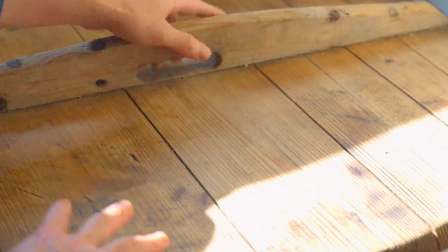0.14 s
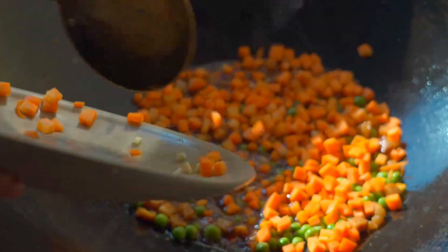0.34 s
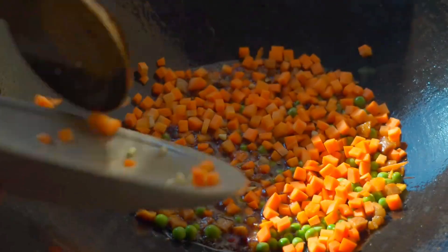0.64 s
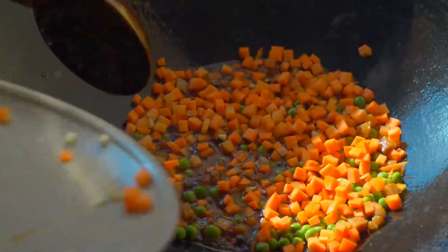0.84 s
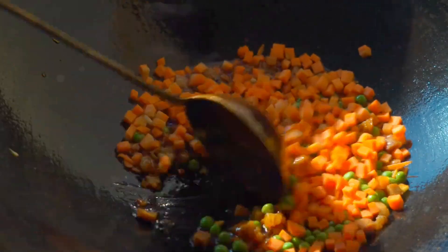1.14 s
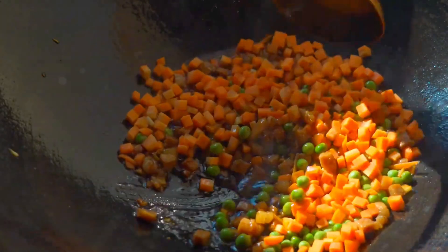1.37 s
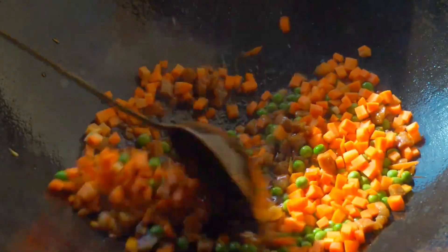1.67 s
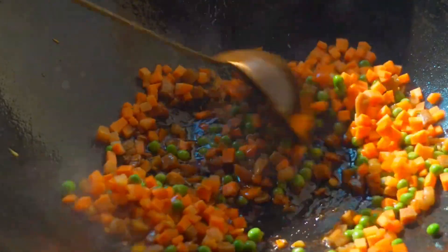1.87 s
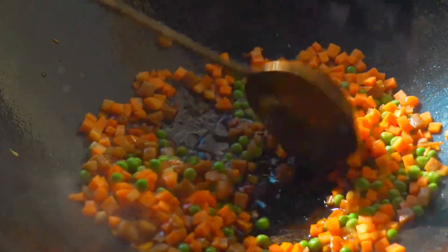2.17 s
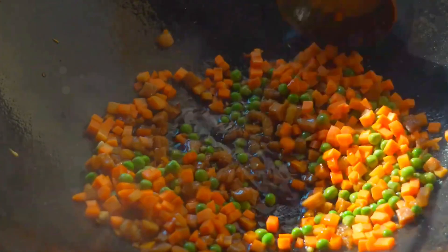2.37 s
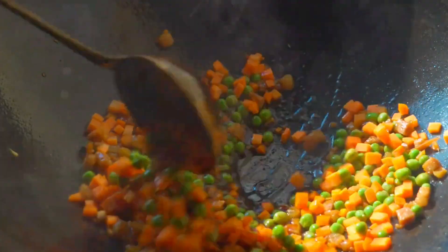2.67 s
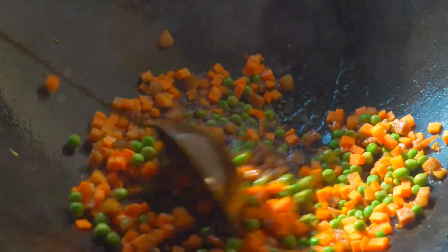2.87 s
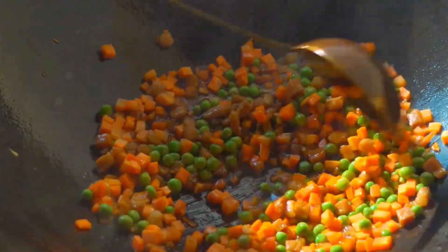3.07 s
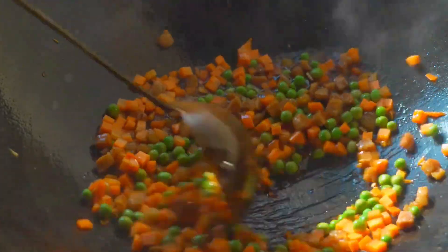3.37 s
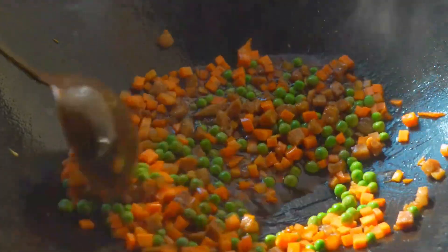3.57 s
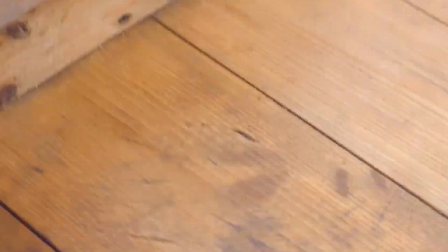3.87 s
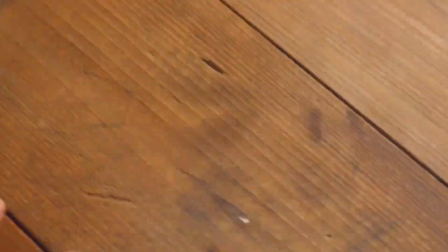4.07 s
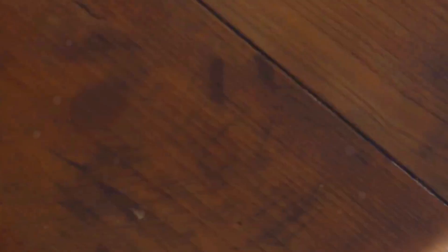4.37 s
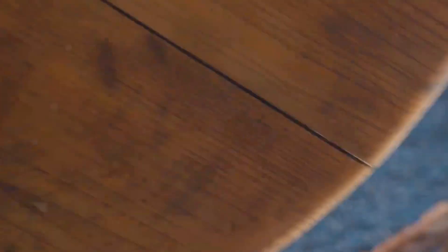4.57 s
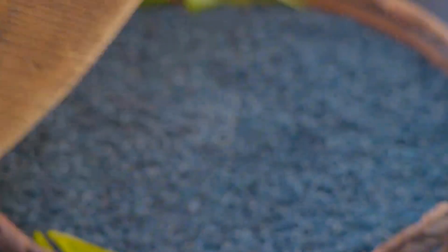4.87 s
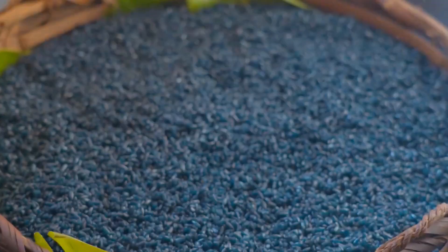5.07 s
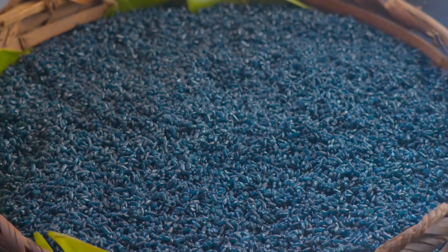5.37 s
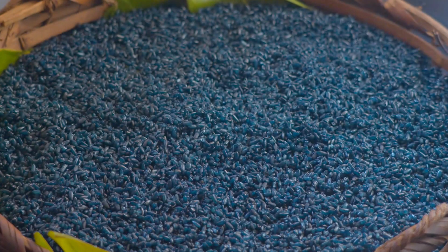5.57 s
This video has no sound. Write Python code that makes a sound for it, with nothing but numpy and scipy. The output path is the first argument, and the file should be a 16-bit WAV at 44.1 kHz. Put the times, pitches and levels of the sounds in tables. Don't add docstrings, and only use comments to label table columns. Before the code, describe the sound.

A faint wooden rustle, then loud wok sizzling with a metal ladle knocking and scraping, a brief hush, and steady steam hiss over bubbling water.

```python
import sys
import numpy as np
from scipy import signal
from scipy.fft import rfft, irfft
from scipy.io import wavfile
from scipy.ndimage import uniform_filter1d

SR = 44100
rng = np.random.default_rng(int(sys.argv[2]) if len(sys.argv) > 2 else 0)


def master(y):
    cut = np.clip(np.atleast_2d(y).T, -1, 1)
    pcm = np.round(cut * 32767)
    wavfile.write(sys.argv[1], SR, pcm.astype(np.int16))


def voltage_ratio(decibels):
    exponent = np.asarray(decibels, float) / 20
    return 10 ** exponent


N = 251811

# (frequency [Hz], density [dB per Hz])
ROOM_SPECTRUM = [(15, -53), (25, -19), (54, -30), (95, -16.5), (154, -2), (331, -12.5), (509, -14.5),
                 (1330, -21.5), (3710, -42), (4820, -60), (7600, -54), (9880, -80), (16700, -120)]
RUSTLE_SPECTRUM = [(350, 3), (600, 2.5), (1560, -7.5), (1720, 2), (1850, -12), (2240, 0.5), (3110, -5),
                   (5300, -7.5), (7600, -35), (9880, -61), (16700, -120)]
HISS_SPECTRUM = [(530, -16), (900, -9), (1160, -2.5), (1330, -7), (1740, -2.5), (1960, -6.5), (2220, -2),
                 (3140, -4.5), (4250, -4), (5270, -7), (6590, -21), (7600, -32.5), (9880, -47),
                 (16700, -120)]
BOIL_SPECTRUM = [(15, -66), (25, -27), (70, -19.5), (123, -5), (218, -7), (252, -1), (391, -3.5),
                 (630, -0.5), (743, 0), (814, 3.5), (1340, -3.5), (2000, 0), (2600, -27), (4400, -120)]
SIZZLE_SPECTRUM = [(530, -21.5), (900, 8), (1080, 4), (1200, 2.5), (1640, 0), (2200, 3.5), (2770, 2),
                   (3030, 0), (3370, 0.5), (4610, -4), (5810, -9.5), (6530, -17), (7600, -29),
                   (9880, -45.5), (16700, -120)]
SIMMER_SPECTRUM = [(15, -74), (25, -50.5), (95, -25.5), (123, -21.5), (145, -20.5), (257, -9.5), (413, -7),
                   (479, -6.5), (515, -9.5), (757, -2), (1630, -11), (2000, -8), (2600, -28.5),
                   (4400, -120)]
# (frequency [Hz], side minus mid [dB])
STEREO_WIDTH = [(60, -7.5), (100, -8.5), (170, -11.5), (300, -14.5), (500, -18.5), (850, -25.5),
                (1450, -19), (2470, -16), (4200, -15), (7150, -15)]
# (start [s], end [s])
HUSHES = [
    (0, 0.292),
    (3.76, 3.897),
]
# (start [s], length [s], level [dB])
STEAMER_HUM = [
    (3.9, 0.35, -8.5),
]
# (start [s], length [s], level [dB])
WOK_HUM = [
    (2.25, 1.7, -10.5),
]
# (start [s], length [s], level [dB])
LADLE_HOLLOW = [
    (3.12, 0.65, -17.5),
]
# (time [s], sizzle level [dB])
HEAT = [(0.3, -24), (0.55, -22.5), (0.75, -24.5), (0.95, -21.5), (1.2, -23.5), (1.3, -19.5), (1.5, -21),
        (1.8, -19.5), (2.3, -18.5), (2.55, -20), (2.8, -19.5), (2.89, -20.5), (3.0, -18.5), (3.25, -20),
        (3.4, -20), (3.55, -19), (3.755, -20)]
# (start [s], length [s], level relative to the sizzle [dB])
FLARES = [(0.53, 0.017, -17), (0.61, 0.011, -5), (1.262, 0.017, -5), (1.32, 0.079, -21),
          (1.378, 0.0042, -12), (1.415, 0.019, -18), (1.5, 0.11, -13), (1.84, 0.016, -8),
          (1.995, 0.011, -24), (2.79, 0.055, -17), (3.22, 0.04, -9.5)]
# (start [s], length [s], strength of cover [dB])
LULLS = [(0.7, 0.04, -14), (1.135, 0.02, -1.5), (1.281, 0.008, -9), (1.297, 0.012, -3), (1.71, 0.013, -12),
         (1.96, 0.034, -3), (2.285, 0.024, -4), (2.46, 0.02, -12), (3.275, 0.022, -13), (3.37, 0.021, -9)]
# (time [s], peak level [dB])
SPITS = [(2.756, -30), (2.84, -11), (2.8631, 0), (2.893, -9.5), (2.942, -10.5), (2.994, -13)]
# (frequency [Hz], level [dB], t60 [s])
SPIT_MODES = [(3800, 3, 0.0034), (2650, 2.5, 0.0065), (1700, -1, 0.0056), (1120, -2, 0.0076),
              (613, 5, 0.0052)]
# (time [s], peak level [dB], centre frequency [Hz])
CRACKS = [(0.5856, -6, 3200), (0.6155, -10, 4800), (0.6294, -6, 4200), (0.6615, -6, 2600),
          (1.0496, -3.5, 2300), (1.0873, -4, 4800), (1.2898, -12.5, 4500), (1.3797, -7, 4500),
          (1.3965, -7, 3200), (1.6868, -10, 2500), (2.2444, -8, 4800), (2.333, -5, 3300),
          (2.4456, -6, 3600), (2.8605, -18, 4100), (2.8645, -7, 1500), (2.8945, -15, 3800),
          (3.3114, -10, 3900), (3.334, -8, 2700), (3.4743, -6, 2200), (3.585, -6, 2300), (0.5866, -7, 800),
          (0.5868, -3, 1150), (0.6293, -7, 1000), (1.0524, 0, 950), (1.2906, -5, 900), (1.2912, -10, 1340),
          (1.2975, -15, 1200), (1.321, -11, 1000), (1.541, -11, 1250), (1.599, -6, 1150), (1.681, -9, 780),
          (1.9385, -5, 756), (1.945, -8, 800), (1.998, -8, 1300), (2.013, -12, 1150), (2.016, -5, 2550),
          (2.036, -2, 2600), (2.058, -8, 2550), (2.088, -10, 2450), (0.824, -14, 900), (0.721, -15, 1250)]
# (time [s], peak level [dB])
THUDS = [(1.088, -16), (1.29, -21), (1.4, -26), (1.685, -24), (2.446, -23), (2.862, -26)]
# (start [s], length [s], level [dB], start frequency [Hz], end frequency [Hz])
SINGING_MODES = [(0.633, 0.025, -18.5, 1494, 1467), (0.664, 0.017, -23, 3150, 3150),
                 (0.664, 0.028, -25, 2250, 2260), (1.112, 0.024, -20.5, 2680, 2490),
                 (1.215, 0.023, -26, 2480, 2450), (1.265, 0.012, -20, 2520, 2530),
                 (1.415, 0.073, -21, 1390, 1390), (1.43, 0.032, -18.5, 1270, 1220),
                 (1.42, 0.03, -20, 512, 513), (1.55, 0.1, -29.5, 390, 390), (1.645, 0.022, -26, 1500, 1330),
                 (1.7, 0.027, -25, 1393, 1280), (1.596, 0.0066, -16.5, 1200, 1196),
                 (1.598, 0.014, -22, 813, 803), (1.632, 0.013, -21, 1300, 1280),
                 (1.535, 0.02, -21.5, 1250, 1160), (1.675, 0.11, -22, 781, 777),
                 (1.705, 0.047, -21.5, 488, 504), (1.745, 0.04, -24, 1475, 1650),
                 (1.937, 0.012, -21, 1410, 1420), (1.955, 0.045, -21.5, 1454, 1495),
                 (1.99, 0.06, -21.5, 900, 746), (2.045, 0.056, -23.5, 1700, 1710),
                 (2.045, 0.11, -30, 760, 805), (2.04, 0.064, -24, 519, 476),
                 (2.008, 0.031, -23, 2480, 2600), (2.135, 0.025, -27, 2810, 2870),
                 (2.135, 0.023, -24, 2220, 2450), (2.495, 0.014, -20, 2400, 2620),
                 (2.5, 0.063, -26, 2690, 2650), (2.515, 0.033, -20, 2580, 2490),
                 (2.866, 0.016, -25, 711, 694), (0.31, 1.63, -39, 249, 249.3),
                 (0.31, 1.47, -40.5, 380.7, 383.7), (3.91, 0.47, -41.5, 249, 251)]
# (start [s], length [s], level [dB])
SQUEALS = [(1.12, 0.054, -25), (1.21, 0.011, -22), (1.265, 0.015, -35), (2.01, 0.083, -24),
           (2.15, 0.011, -27), (2.475, 0.0085, -23), (2.49, 0.061, -16)]
# (frequency [Hz], level [dB], t60 [s])
RIM_MODES = [(2440, -6, .05), (2520, 0, .09), (2585, -4, .07), (2665, -2, .08)]
# (start [s], length [s], level [dB])
BOTTOM_STROKES = [(1.095, 0.038, -15.5), (1.41, 0.043, -14.5), (1.56, 0.099, -20), (1.7, 0.069, -27.5),
                  (1.945, 0.1, -15), (2.06, 0.066, -20), (0.8, 0.18, -23), (1.645, 0.03, -23)]
WALL_STROKES = [(1.095, 0.024, -20), (1.42, 0.028, -17.5), (1.6, 0.012, -20), (1.7, 0.028, -26),
                (1.95, 0.02, -16), (2.13, 0.024, -31)]
# (frequency [Hz], level [dB], t60 [s])
WOK_MODES = [(390, -34.5, 0.028), (457, -9, 0.066), (533, -22, 0.1), (590, -9, 0.044), (700, -17.5, 0.018),
             (794, 0.5, 0.024), (880, -12.5, 0.05), (1049, 7, 0.043), (1232, 0.5, 0.076),
             (1280, 7.5, 0.034), (1370, -9, 0.051), (1390, 1, 0.15), (1660, -4, 0.027)]
# (time [s], peak level [dB], main mode [Hz], second mode [Hz], second mode level [dB])
KNOCKS = [(0.5866, 4.5, 1487, 776, -14), (0.615, -10, 1560, 627, -6), (0.6299, 2, 1400, 744, -2.5),
          (0.6623, -1, 2245, 3090, 3), (1.0523, -4.5, 975, 723, 6), (1.088, 1, 920, 2940, -8),
          (1.118, -9, 800, 2650, 13), (1.2911, 2, 1098, 780, 0.5), (1.3992, 3, 1185, 843, 0),
          (1.4043, 2.5, 1270, 800, -19), (1.4204, -2, 1370, 1190, -9), (1.4336, -11, 1390, 1250, -1),
          (1.5452, -7, 1175, 830, 7), (1.6013, -4, 1200, 805, -2), (1.638, -10, 1270, 880, 4),
          (1.687, 1.5, 752, 466, 6), (2.053, -13, 1622, 790, 19), (1.7515, -10, 1580, 783, -5),
          (1.9376, 0, 773, 1390, -7), (1.947, -8, 1390, 690, 5), (2.159, -14, 1170, 2720, 15),
          (2.2432, -12, 2300, 2230, 10), (2.447, -9.5, 1040, 2620, 11), (1.709, -10, 473, 795, 8)]

EVEN_HEAT_DB = -23
HUM_HZ, HUM_T60_S = 805, 0.064
HUM_DB_PER_S = 47
MIC_CUT_HZ = 6760
SPIT_S = 0.0055


def rms_one(x):
    return x / np.sqrt(np.mean(x ** 2) + 1e-20)


def butter(x, order, hz, kind="low"):
    return signal.sosfilt(signal.butter(order, hz, kind, fs=SR, output="sos"), x)


def in_time(rows, fade=.004):
    s, *columns = np.transpose(rows)
    t = np.arange(N) / SR
    gate = np.clip(np.minimum(t - s[0], s[-1] - t) / fade + 1, 0, 1)
    return gate, [np.interp(t, s, c) for c in columns]


def at_hz(points, hz):
    point_hz, db = np.transpose(points)
    return np.interp(np.log(hz), np.log(point_hz), db)


def drift(rate):
    r = np.exp(-80 * np.pi * rate / SR)
    noise = rng.standard_normal(N // 40 + 2002)
    slow = signal.lfilter([1], [1, -2 * r, r * r], noise)[2000:]
    return np.interp(np.arange(N) / 40, np.arange(len(slow)), rms_one(slow - slow.mean()))


def ring(clicks, hz, t60):
    r, w = voltage_ratio(-60 / (t60 * SR)), 2 * np.pi * hz / SR
    return signal.lfilter([0, np.sin(w)], [1, -2 * r * np.cos(w), r * r], clicks + 1e-18)


def grains(per_s, spread_db):
    tail = np.minimum(rng.exponential(1, N), 5)
    sizes = voltage_ratio(max(spread_db, 1) * tail) * rng.choice([-1, 1], N)
    return rms_one(sizes * (rng.random(N) < per_s / SR))


def colour(source, spectrum, flicker_db, low, high):
    hz = np.maximum(np.fft.rfftfreq(N, 1 / SR), 5)
    bottom_hz, top_hz = spectrum[0][0], spectrum[-1][0]
    shape = voltage_ratio(at_hz(spectrum, hz)) * (hz > bottom_hz) * (hz < top_hz)
    mid = rfft(source)
    side = rfft(rng.standard_normal(N)) * voltage_ratio(at_hz(STEREO_WIDTH, hz))
    both = np.array([mid + side, mid - side]) * shape
    out, together = 0, drift(1.15)
    for octave in np.arange(np.floor(np.log2(bottom_hz)), np.log2(top_hz) + 1):
        share = np.cos(np.pi / 2 * np.clip(np.log2(hz) - octave, -1, 1)) ** 2
        flicker = voltage_ratio(flicker_db * (together + 0.73 * drift(23)))
        out = out + irfft(both * share, N) * flicker
    inside = irfft(rfft(out.mean(0)) * (hz > low) * (hz < high), N)
    return out / np.sqrt(np.mean(inside ** 2))


def split(x, kind):
    return butter(x, 2, 1600, kind)


def strokes(rows, rise_db_per_s, fall_db_per_s):
    t = np.arange(N) / SR
    out = 0
    for s, length, db in rows:
        rise_db = rise_db_per_s * np.maximum(s - t, 0)
        fall_db = fall_db_per_s * np.maximum(t - s - length, 0)
        out = out + voltage_ratio(np.maximum(db - rise_db - fall_db, -200))
    return out


def widen(x, db):
    mid, side = (x[0] + x[1]) / 2, (x[0] - x[1]) / 2 * voltage_ratio(db)
    return np.array([mid + side, mid - side])


def hush():
    room = colour(rng.standard_normal(N), ROOM_SPECTRUM, 0.58, 60, 750)
    rustle = colour(grains(4000, spread_db=-6.5), RUSTLE_SPECTRUM, 1.0, 880, 7000)
    first, second = (in_time([(s, 0) for s in span], fade=.006)[0] for span in HUSHES)
    slide = strokes([(0.2, 0.018, 0)], rise_db_per_s=600, fall_db_per_s=500)
    wok_tail = strokes([(HUSHES[1][0], 0, -31)], rise_db_per_s=0, fall_db_per_s=700)
    far_rustle = voltage_ratio(-52.5)
    before = (voltage_ratio(-41.5) + voltage_ratio(-44) * slide) * room
    before = before + (far_rustle + voltage_ratio(-33.5) * slide) * rustle
    between = (voltage_ratio(-49) + voltage_ratio(-22) * wok_tail) * room + (far_rustle + wok_tail) * rustle
    return first * before + second * between


def steamer():
    start_s = 3.903
    gate, (since_s,) = in_time([(start_s, 0), (N / SR, N / SR - start_s)], fade=.009)
    hiss = split(colour(grains(12000, spread_db=-2.0), HISS_SPECTRUM, 0.11, 1730, 7000), "high")
    boil = split(colour(grains(2500, spread_db=-1.0), BOIL_SPECTRUM, 0.43, 150, 2400), "low")
    hum = rms_one(ring(boil, HUM_HZ, HUM_T60_S))
    boil = boil + strokes(STEAMER_HUM, HUM_DB_PER_S, HUM_DB_PER_S) * hum
    return gate * (voltage_ratio(-23 - 0.86 * since_s) * hiss + voltage_ratio(-31 + 1.5 * since_s) * boil)


def frying():
    gate, (sizzle_db,) = in_time(HEAT)
    hotter_db = sizzle_db - EVEN_HEAT_DB
    sizzle = split(colour(grains(11000, spread_db=0.4), SIZZLE_SPECTRUM, 1.0, 2310, 7000), "high")
    top = butter(sizzle, 2, 4500, "high")
    sizzle = sizzle + (voltage_ratio(5 + 0.8549 * hotter_db) - 1) * top
    hollow = rms_one(ring(sizzle, 2260, 0.0032))
    sizzle = sizzle + strokes(LADLE_HOLLOW, HUM_DB_PER_S, HUM_DB_PER_S) * hollow
    sizzle = sizzle * (1 + strokes(FLARES, rise_db_per_s=404.5, fall_db_per_s=1208))
    sizzle = sizzle * np.clip(1.5 - strokes(LULLS, 500, 500), .1, 1)
    simmer = split(colour(grains(2500, spread_db=-3.0), SIMMER_SPECTRUM, 0.2, 150, 1500), "low")
    hum = rms_one(ring(simmer, HUM_HZ, HUM_T60_S))
    simmer = simmer + strokes(WOK_HUM, HUM_DB_PER_S, HUM_DB_PER_S) * hum
    simmer_db = -23.5 - 1.82 * np.arange(N) / SR
    return gate * widen(voltage_ratio(sizzle_db) * sizzle + voltage_ratio(simmer_db) * simmer, hotter_db)


def spits():
    out, left, t = np.zeros(N), np.ones(N), np.arange(N) / SR
    size = round(SPIT_S * SR)
    for (s, db), noise in zip(SPITS, rng.standard_normal((len(SPITS), 600))):
        puff = np.pad(noise[:size] * np.hanning(size), (0, 600))
        puff[size // 2] += 6.0
        burst = 0
        for k, (hz, mode_db, t60) in enumerate(SPIT_MODES):
            burst = burst + (-1) ** k * ring(puff, hz, t60) * voltage_ratio(mode_db) / np.sqrt(t60)
        burst = butter(burst, 3, 220, "high")
        out[round(s * SR) - size // 2:][:len(burst)] += voltage_ratio(db) * burst / np.abs(burst).max()
        refill = (t > s - SPIT_S / 2) * np.exp(-np.maximum(t - s, 0) / 0.031)
        left *= 1 - np.clip(0.63 * voltage_ratio(db), 0, .9) * refill
    return out, left


def cracks():
    out, size = np.zeros(N), round(0.0034 * SR)
    for (s, db, hz), noise in zip(CRACKS, rng.standard_normal((len(CRACKS), 600))):
        puff = np.pad(noise[:size] * np.hanning(size) ** 2, (0, 600))
        snap = ring(puff, hz, 6 / hz)
        out[round(s * SR) - size // 2:][:len(snap)] += voltage_ratio(db) * snap / np.abs(snap).max()
    thud_clicks = np.zeros(N)
    for s, db in THUDS:
        thud_clicks[round(s * SR)] = voltage_ratio(db)
    thud = butter(ring(thud_clicks, 190, 0.013), 2, 70, "high")
    return butter(out, 4, [500, MIC_CUT_HZ], "band") + thud


def sings():
    out, t = np.zeros(N), np.arange(N) / SR
    steady, width_hz = 1.0, 75
    waver = np.array([drift(width_hz), drift(width_hz)])
    for k, (s, length, db, from_hz, to_hz) in enumerate(SINGING_MODES):
        near = slice(max(round((s - .05) * SR), 0), round((s + length + .15) * SR))
        glide_hz = np.interp(t[near], [s, s + length], [from_hz, to_hz])
        turn = 2 * np.pi * np.cumsum(glide_hz) / SR
        along, across = np.roll(waver, k * SR // 7, axis=1)[:, near]
        tone = (steady + along) * np.sin(turn) + across * np.cos(turn)
        tone = tone / np.sqrt(1 + steady ** 2 / 2)
        swell = strokes([(s, length, db)], rise_db_per_s=2498, fall_db_per_s=900)[near]
        out[near] += voltage_ratio(-1.0) * swell * tone
    return out


def squeal():
    rub = grains(1500, spread_db=2.5)
    tone = rms_one(sum(voltage_ratio(db) * ring(rub, hz, t60) for hz, db, t60 in RIM_MODES))
    return voltage_ratio(-9.5) * strokes(SQUEALS, rise_db_per_s=295.5, fall_db_per_s=704) * tone


def scrape():
    rise_db_per_s, fall_db_per_s, wall_hz = 892, 210, 950
    slips = grains(1200, spread_db=2.5) * voltage_ratio(2 * drift(30))
    bottom, wall = 0, 0
    for hz, db, t60 in WOK_MODES:
        level = voltage_ratio(db + drift(25))
        mode = level * ring(slips * rng.normal(1, 0.38, N), hz, t60)
        if hz < wall_hz:
            bottom = bottom + mode
        else:
            wall = wall + mode
    out = voltage_ratio(-5.0) * strokes(BOTTOM_STROKES, rise_db_per_s, fall_db_per_s) * rms_one(bottom)
    out = out + strokes(WALL_STROKES, rise_db_per_s, fall_db_per_s) * rms_one(wall)
    return butter(out, 3, 360, "high")


def knocks():
    out, luck = np.zeros(N), rng.normal(0, 3.1, (len(KNOCKS), len(WOK_MODES)))
    swell_noise = rng.standard_normal((len(KNOCKS), 160))
    swell = np.sin(np.pi * np.arange(160) / 159) ** 2
    long_t60, overdrive_db = 0.048, 6
    for (s, peak_db, main_hz, second_hz, second_db), lucky_db, contacts in zip(KNOCKS, luck, swell_noise):
        click = np.zeros(SR // 4)
        click[:160] = 0.12 * contacts * swell
        click[110] += 1
        clang = voltage_ratio(-4) * ring(click, 720, .011) - voltage_ratio(-5) * ring(click, 1050, .009)
        clang = clang + ring(click, main_hz, 0.016)
        crack = ring(click, 2200, 0.004) - ring(click, 3200, 0.0037) + ring(click, 4500, 0.0047)
        hit = clang + voltage_ratio(-3) * crack + voltage_ratio(-10.5) * ring(click, main_hz, long_t60)
        second = ring(click, second_hz, 0.0051) + .5 * ring(click, second_hz, long_t60)
        hit += voltage_ratio(second_db) * second
        for (hz, db, t60), mode_luck_db in zip(WOK_MODES, lucky_db):
            hit += voltage_ratio(db + mode_luck_db - 17) * ring(click, hz, t60 * .6)
        i = round(s * SR) - np.abs(hit).argmax()
        out[i:i + len(hit)] += voltage_ratio(peak_db + overdrive_db) * hit / np.abs(hit).max()
    return out


def metal():
    direct = butter(knocks() + scrape() + squeal(), 4, 420, "high")
    direct = butter(direct + sings(), 8, MIC_CUT_HZ)
    echo_t60 = 0.11
    echoes = rng.standard_normal((2, 1800)) * voltage_ratio(-60 * np.arange(1800) / SR / echo_t60)
    echoes[:, :90] = 0
    reflected = [signal.fftconvolve(direct, echo)[:N] for echo in echoes]
    return direct + voltage_ratio(-34.5) * widen(reflected, -7)


def scene():
    fry, rest = frying(), steamer() + hush() + metal()
    bursts, left = spits()
    image_flutter_db = 5.5 * drift(23)
    both = widen(fry * left + bursts + rest, image_flutter_db) + cracks()
    side = (both[0] - both[1]) / 2
    side_top = signal.sosfiltfilt(signal.butter(4, 8500, "high", fs=SR, output="sos"), side)
    centred = both - side_top * [[1], [-1]]
    return signal.sosfilt(signal.cheby2(10, 40, 10200, fs=SR, output="sos"), centred)


def roll_off(x):
    return signal.sosfilt(signal.butter(12, 16000, fs=SR, output="sos"), x)


def record(dry):
    limit_db, release_db_per_s, attack_s = -2, 188, 0.0085
    over_db = np.maximum(20 * np.log10(np.abs(dry).max(0) + 1e-9) - limit_db, 0)
    slope = release_db_per_s * np.arange(N) / SR
    held_db = np.maximum.accumulate(over_db + slope) - slope
    duck_db = uniform_filter1d(held_db, round(2 * attack_s * SR))
    clipped = np.clip(dry * voltage_ratio(-duck_db), -1, 1)
    return roll_off(clipped)


dry = scene()
out = record(dry)
master(out)
```